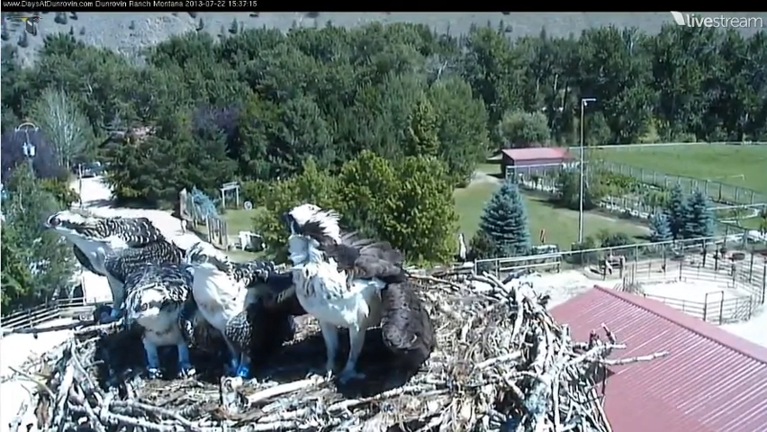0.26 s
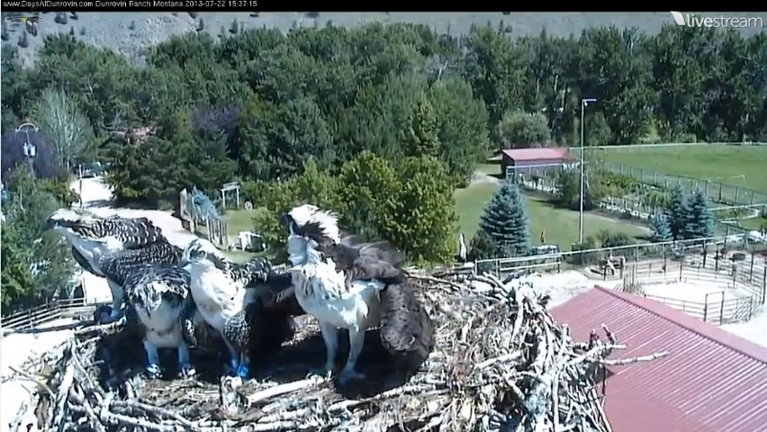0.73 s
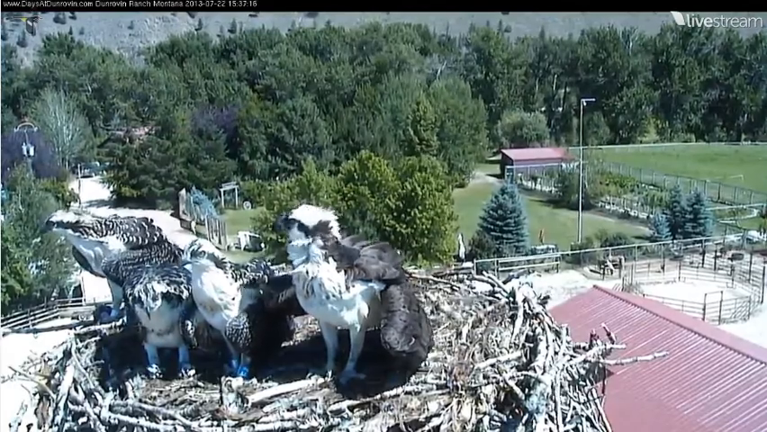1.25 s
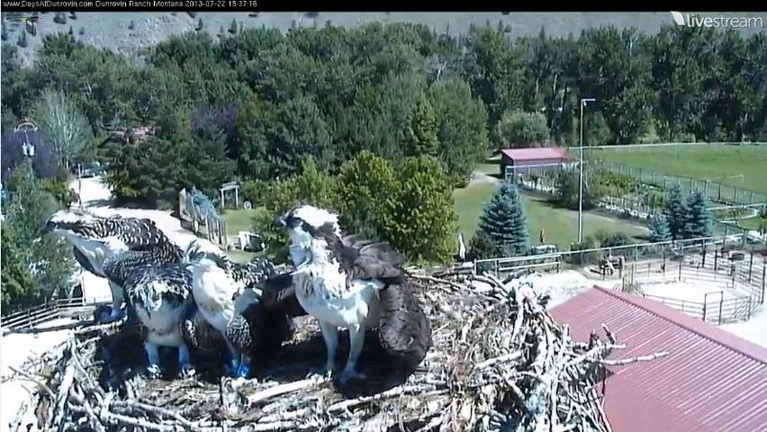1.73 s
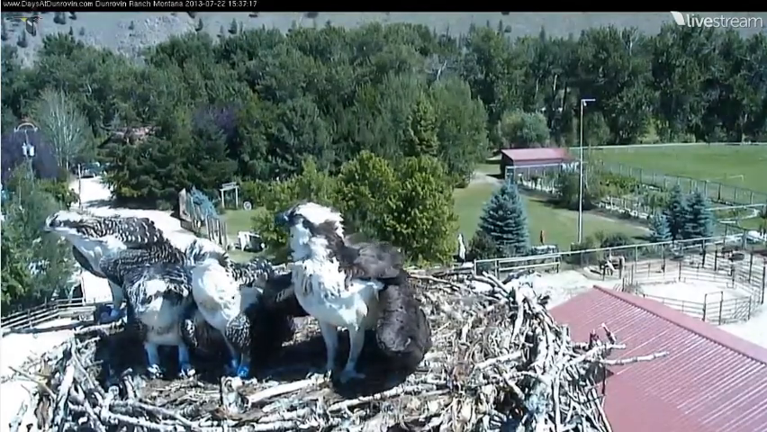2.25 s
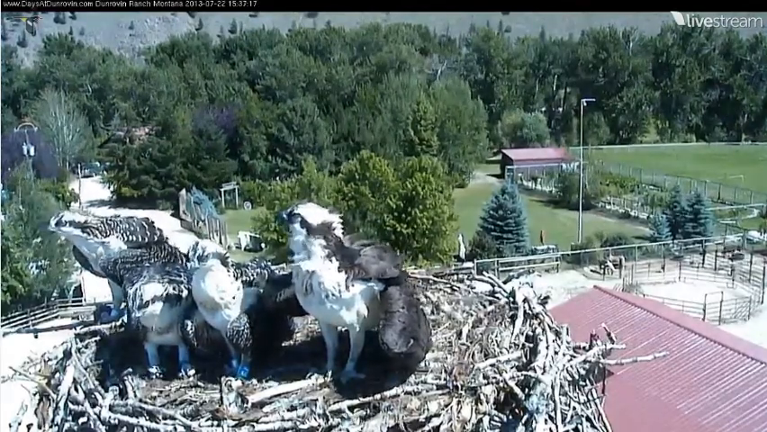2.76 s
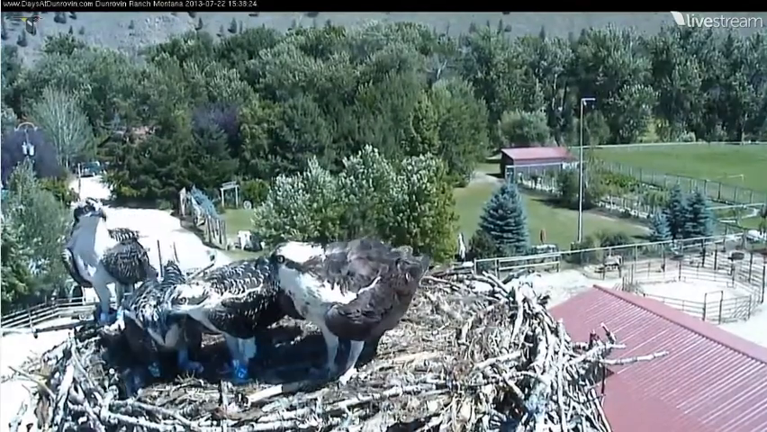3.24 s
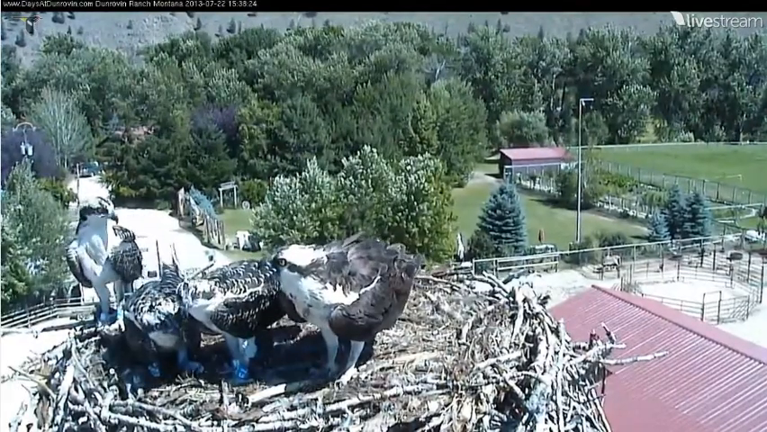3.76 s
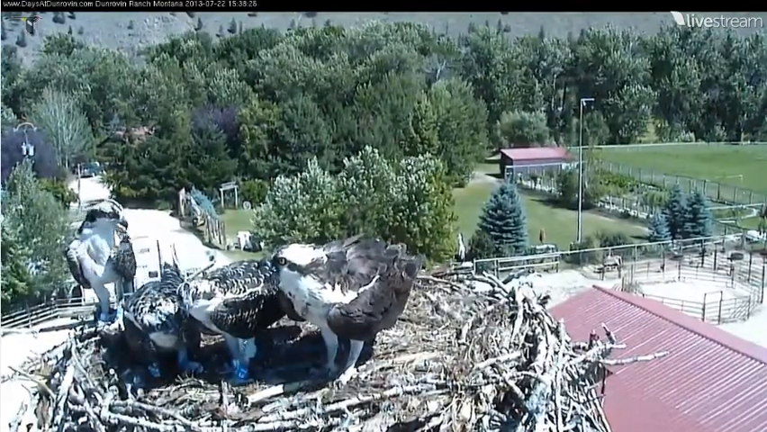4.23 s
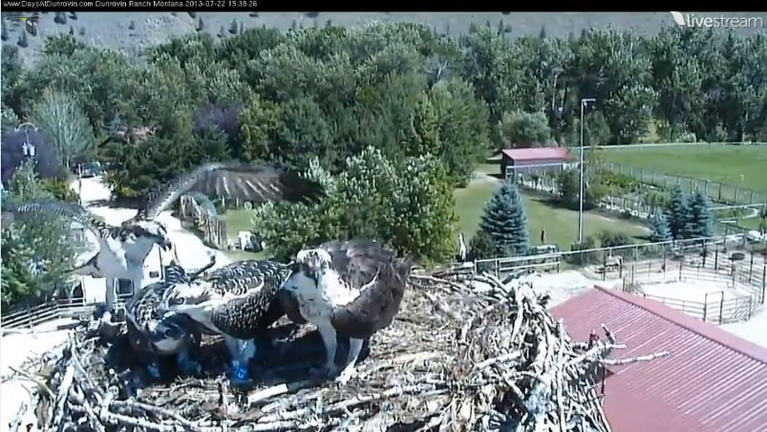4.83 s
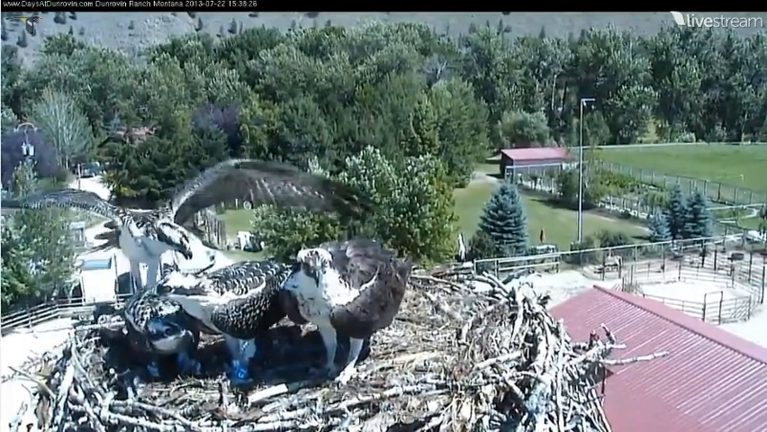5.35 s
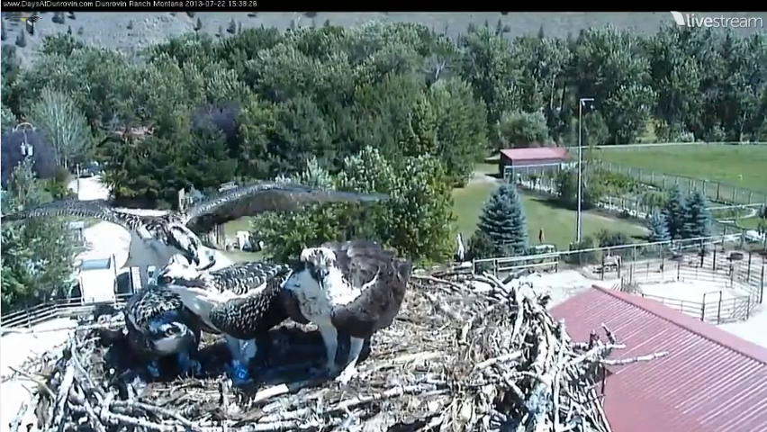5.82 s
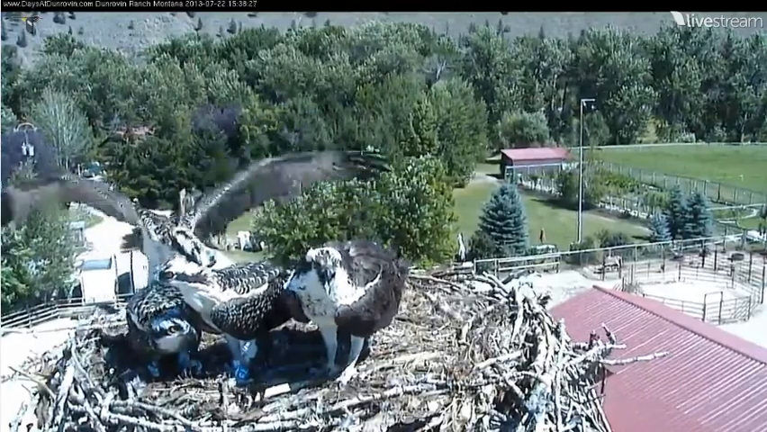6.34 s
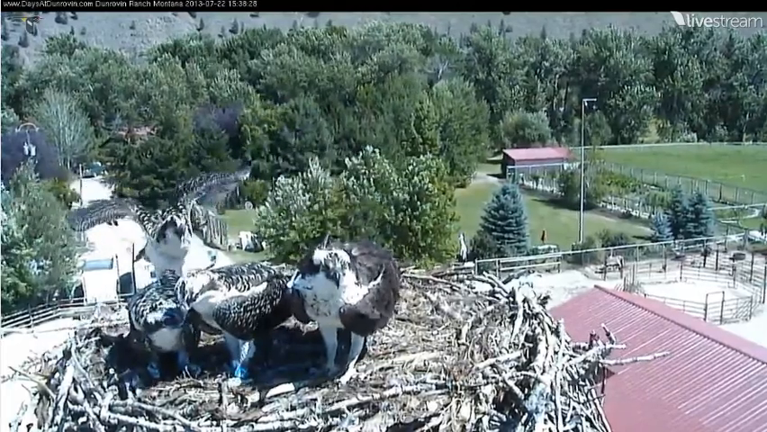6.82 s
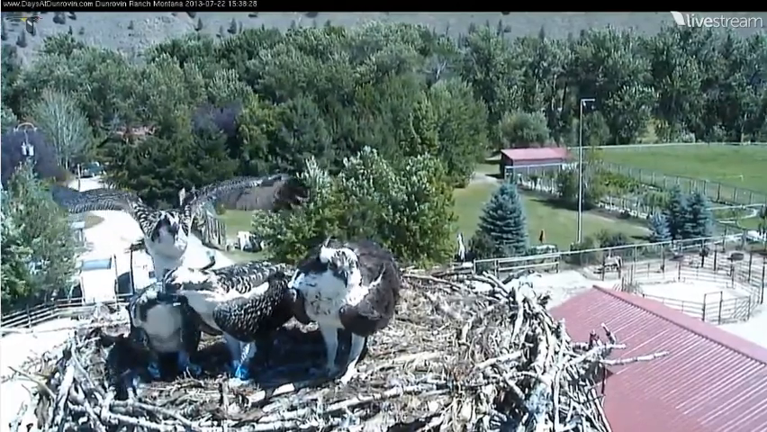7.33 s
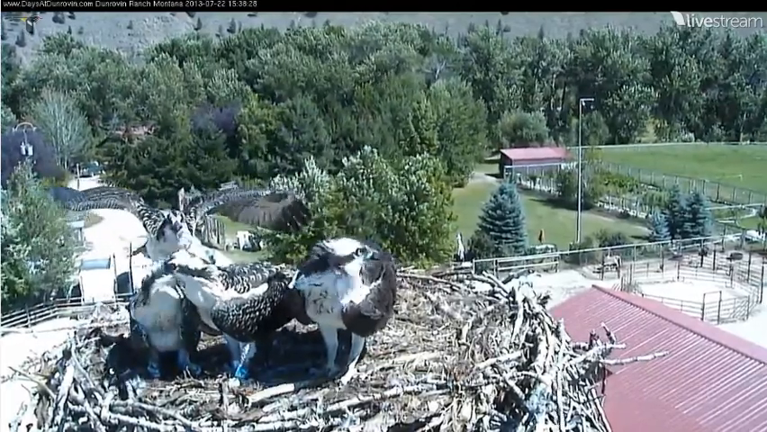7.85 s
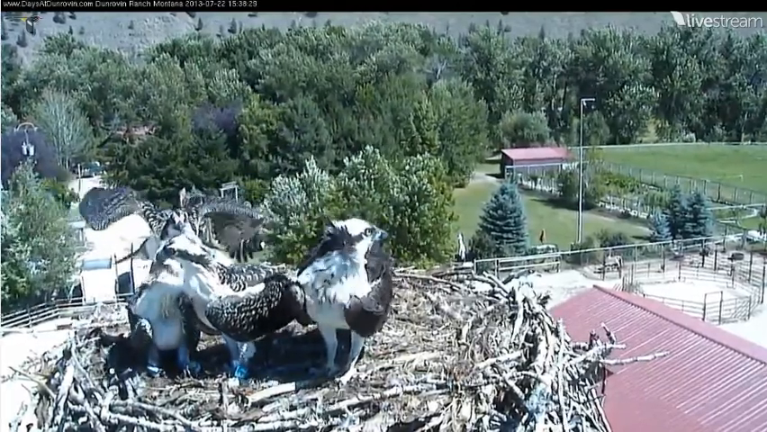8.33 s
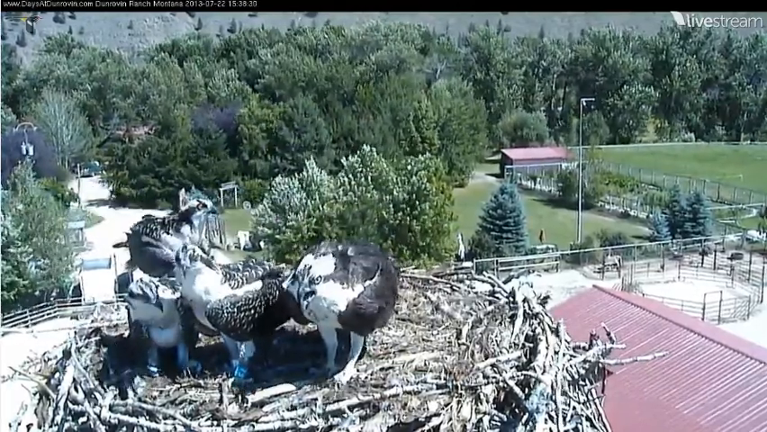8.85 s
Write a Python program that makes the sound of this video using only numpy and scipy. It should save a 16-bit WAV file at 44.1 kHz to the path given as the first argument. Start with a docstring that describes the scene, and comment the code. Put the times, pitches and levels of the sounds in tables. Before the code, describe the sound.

Three warbled songbird chirps over steady hum and hiss, then two ospreys whistle sharp, high, overdriven notes in quickening runs, close on the left.

```python
"""Two ospreys on a nest, close to the left microphone, whistle arched notes: near sines on gliding pitch curves.
A small songbird nearby gives three warbled chirps before them; far songbirds twitter and trill faintly.
Mains hum, broad hiss and light wind lie beneath, as steady sines and shaped noise.
Loud notes overload a slow converter, so their overtones fold back around the whistle,
and then overload the output once more, with grit."""
import sys
import numpy as np
from scipy import signal
from scipy.io import wavfile
from scipy.ndimage import uniform_filter1d

SR = 44100
rng = np.random.default_rng(int(sys.argv[2]) if len(sys.argv) > 2 else 0)


def generate_wav(signal):
    """Clip the signal to [-1, 1] and save it as 16-bit WAV at the path in sys.argv[1]."""
    frames = np.transpose(np.atleast_2d(signal))
    scaled = np.clip(frames, -1, 1) * 32767
    pcm = np.round(scaled).astype(np.int16)
    wavfile.write(sys.argv[1], SR, pcm)


def linear_from_db(decibels):
    """Turn decibels (scalar or array-like) into linear amplitude factors; 0 gives 1."""
    return 10 ** (np.asarray(decibels, float) / 20)


N = 400428

# hoarse notes of the first osprey: start_s, length_s, top_pitch_hz, effort_db (relative)
FIRST_OSPREY = [(3.571, 0.053, 2565, -9), (3.73, 0.068, 2864, -2), (3.89, 0.068, 2936, -1.5),
                (4.051, 0.067, 2924, -3), (4.223, 0.064, 3000, -3), (4.38, 0.065, 3083, -3.5),
                (4.551, 0.068, 3094, -2), (4.715, 0.059, 3204, -5.5), (4.888, 0.05, 3190, -11.5),
                (5.055, 0.063, 3140, -12.5), (5.225, 0.064, 3150, -12.5), (5.406, 0.076, 3100, -10.5),
                (5.596, .058, 2995, -8), (5.765, 0.062, 3064, -8.5), (5.933, 0.079, 3013, -2.5),
                (6.095, 0.084, 3068, -1), (6.266, 0.082, 3252, -2), (6.437, 0.081, 3240, -1.5),
                (6.611, 0.087, 3236, -1), (6.795, 0.085, 2987, -2.5)]
# clear notes of the second osprey: start_s, length_s, top_pitch_hz, final_droop_hz,
# grace_length_s (low grace note before it, 0 for none)
SECOND_OSPREY = [(3.174, 0.084, 2668, 300, 0), (4.676, 0.082, 2597, 362, 0), (4.838, .075, 2825, 494, 0.02),
                 (4.998, 0.072, 2882, 542, .023), (5.159, 0.069, 2832, 305, 0.018),
                 (5.331, 0.078, 2792, 184, 0.033), (5.511, 0.075, 2798, 308, .025),
                 (5.727, 0.073, 2708, 292, 0.023), (7.101, 0.08, 2616, 416, 0),
                 (7.258, 0.077, 2820, 479, 0.019), (7.415, 0.077, 2880, 474, 0.018),
                 (7.578, 0.073, 2825, 288, 0.021), (7.744, 0.077, 2885, 319, 0.022),
                 (7.912, .081, 2905, 348, .017), (8.083, 0.078, 2935, 333, .023),
                 (8.256, .076, 2946, 371, 0.02), (8.426, 0.081, 2947, 315, 0.015),
                 (8.603, 0.081, 3027, 300, .018), (8.781, .078, 3060, 314, 0.025),
                 (8.957, 0.082, 3040, 257, 0.026)]
# brief flips of an osprey into a higher register: start_s, length_s, pitch_hz, level_db (relative)
REGISTER_FLIPS = [(4.866, 0.031, 3567, -2.5), (5.027, 0.017, 3710, -6.5), (6.3, 0.019, 3790, -4.5),
                  (6.476, 0.012, 3817, -5.5), (6.657, 0.0078, 3654, -4), (7.446, 0.017, 3540, -6.5)]
# turning points of each near songbird chirp, one list per chirp: time_s, pitch_hz, level_db (relative)
SONGBIRD_CHIRPS = [
    [(.635, 3360, -24), (.662, 3750, -13.5), (.676, 5340, -13), (.701, 5390, -20), (.711, 4100, -3.5),
     (.721, 3206, -16), (.736, 3700, -9), (.748, 3190, -8), (.76, 3550, -1), (.785, 4360, -4),
     (.803, 3300, -6.5), (.85, 3240, -29)],
    [(1.712, 3340, -6), (1.724, 4650, -11), (1.736, 4600, -5), (1.75, 3180, 5.5), (1.758, 4250, -0.5),
     (1.766, 3115, 0), (1.787, 3800, 7.5), (1.808, 2730, 2.5), (1.822, 3040, -0.5), (1.84, 2680, -5),
     (1.88, 2730, -32)],
    [(2.605, 3545, -10), (2.619, 3810, -8.5), (2.628, 5005, -14), (2.656, 5360, -17), (2.667, 3900, -3.5),
     (2.677, 3060, -11), (2.687, 3820, -2), (2.7, 3050, -34), (2.707, 3250, 0.5), (2.737, 4220, -6.5),
     (2.752, 3650, -1.5), (2.77, 2930, -20)],
]
# thin far trills: start_s, length_s, starting_pitch_hz, level_db (relative)
FAR_TRILLS = [(0.324, 0.24, 7950, -46), (2.31, 0.26, 7900, -48.5)]
# mains lines: pitch_hz, level_db (rms)
MAINS_LINES = [(120.1, -33.5), (240.1, -37.5), (360.1, -44.5), (516, -49), (1092, -43.5)]
# spectrum of the broad hiss: frequency_hz, density_db (relative, per Hz)
HISS_SPECTRUM = [(25, -34), (60, -17), (130, -7.5), (300, -12), (600, -13.5), (1500, -10), (2650, -7),
                 (3800, -17), (5300, -31.5)]
# likeness of the hiss in the two microphones: frequency_hz, correlation (0 to 1)
HISS_LIKENESS = [(60, 0.15), (150, 0.4), (600, 1), (1400, 0.95), (3000, 0.48), (5000, 0.29)]
# balance of the hiss: frequency_hz, left_over_right_db
HISS_BALANCE = [(60, 5.5), (250, 0.5), (1300, -0.5), (2400, 3), (3400, 13), (4400, 5.5)]
# swell of the treble of the hiss: time_s, level_db (relative)
HISS_TREBLE = [(0, 0.5), (1.5, 2), (3, 2), (3.3, -1.5), (5, -7), (7, -3), (9.1, -9.5)]
# strength of the wind: time_s, level_db (relative)
WIND_LEVEL = [(0, -51), (3.06, -52), (3.49, -39), (4.75, -38.5), (5.36, -33.5), (5.87, -49.5), (6.9, -43.5),
              (7.1, -37.5), (7.66, -36), (8.42, -53), (9.0, -40.5)]
# spectrum of the electronic hiss: frequency_hz, density_db (relative, per Hz)
ELECTRONIC_SPECTRUM = [(3180, -33.5), (5400, 4.5), (6360, 2.5), (7610, -8.5), (8370, -10.5), (11600, -10.5),
                       (14000, -19)]
# echoes from roofs: delay_s, level_db (relative)
ROOF_ECHOES = [(.07, -36), (.103, -34), (.112, -34), (.124, -33)]
# spectrum of the grit on overloaded notes: frequency_hz, density_db (relative, per Hz)
GRIT_SPECTRUM = [(300, 10.5), (1200, -0.5), (2500, 16), (4500, -17), (6500, -14.5), (8300, -1),
                 (12200, -25), (13900, -3), (15500, -66)]
# the nearest of the far songbirds: start_s, level_db (relative)
FAR_SONGBIRDS = [(.92, -17.5), (2.82, -21), (3.68, -19.5), (4.3, -21), (4.79, -17), (5.24, -19), (5.6, -16),
                 (5.72, -30), (6.07, -30), (6.83, -18.5), (7.25, -20.5), (8.54, -19), (8.7, -17),
                 (8.86, -21)]


def evened(x):
    """Scale to an rms of 1 over all channels."""
    return x / np.sqrt(np.mean(x ** 2) + 1e-20)


def read(points, hz):
    """Read a curve of (frequency, value) points along log frequency."""
    f, value = np.transpose(points)
    return np.interp(np.log(hz + 1), np.log(f + 1), value)


def add(mix, start_s, sound):
    """Lay a sound into the mix at its start time, cut at the end of the mix."""
    part = mix[round(start_s * SR):][:len(sound)]
    part += sound[:len(part)]


def wobble(count, seconds):
    """Smoothed random drift of rms 1; a longer smoothing time drifts more slowly."""
    drift = uniform_filter1d(rng.standard_normal(count), max(round(seconds * SR), 1))
    return evened(uniform_filter1d(drift, 40))


def hum():
    """Steady mains lines, each a sine with a slight drift of level, the same in both microphones."""
    t = np.arange(N) / SR
    mix = np.zeros(N)
    for hz, db in MAINS_LINES:
        level = linear_from_db(db + 0.28 * wobble(N, 0.22)) * np.sqrt(2)  # a sine's peak over its rms
        mix += level * np.sin(2 * np.pi * (hz * t + rng.random()))
    return mix


def noise(spectrum, db, likeness, balance, swell=((0, 0), (1, 0)), patchy_db=2.0):
    """Random short-time spectra with drifting treble patches, partly shared by the microphones."""
    frames, hz = N // 256 + 5, np.fft.rfftfreq(1024, 1 / SR)
    a, b, c, d, patches = rng.standard_normal((frames, 513, 5)).T
    patches = evened(uniform_filter1d(uniform_filter1d(patches, 10, 0), 8, 1))
    same = np.clip(read(likeness, hz), -1, 1)[:, None]
    left = a + 1j * b
    right = same * left + np.sqrt(1 - same ** 2) * (c + 1j * d)
    treble = np.clip((hz - 2000) / 1500, 0, 1)[:, None]  # swell and patches fade in from 2 to 3.5 kHz
    swell_db = np.interp(np.arange(frames) * 256 / SR, *np.transpose(swell)) + patchy_db * patches
    lean_db = read(balance, hz)[:, None] / 2
    shape_db = read(spectrum, hz)[:, None] + np.array([lean_db, -lean_db]) + treble * swell_db
    spectra = np.array([left, right]) * linear_from_db(shape_db)
    return linear_from_db(db) * evened(signal.istft(spectra, nperseg=1024, noverlap=768)[1][:, :N])


def hiss():
    """Broad background hiss, shaped noise whose treble swells and is patchy."""
    return noise(HISS_SPECTRUM, -24, HISS_LIKENESS, HISS_BALANCE, HISS_TREBLE, patchy_db=4.0)


def electronic_hiss():
    """Faint electronic hiss, noise with a strong shared part in the two channels."""
    likeness, balance = [(0, .6), (1, 0.91)], [(0, 0.0068), (1, 0.0014)]
    return noise(ELECTRONIC_SPECTRUM, -53.5, likeness, balance)


def wind():
    """Lumpy low rumble: band-passed noise, partly shared by the two microphone ports."""
    band = signal.butter(2, [22, 170], "band", fs=SR, output="sos")
    gusts = signal.sosfilt(band, rng.standard_normal((3, N)))
    lumps_db = 2.5 * wobble(N, .04)
    lumps = linear_from_db(np.interp(np.arange(N) / SR, *np.transpose(WIND_LEVEL)) + lumps_db)
    return linear_from_db(5.0) * lumps * evened(gusts[:2] + 1.8 * gusts[2])  # the third is common to both ports


def whistle(hz, db, rise, fall, octave_db, breath_db=-40):
    """A near sine with its octave, hoarse breath, a slight tremble and soft ends (rise and fall in s)."""
    band = signal.butter(2, [2600, 4700], "band", fs=SR, output="sos")
    breath = linear_from_db(breath_db) * evened(signal.sosfilt(band, rng.standard_normal(len(hz))))
    t = np.arange(len(hz)) / SR
    trembling_hz = hz * (1 + 0.0031 * wobble(len(hz), 0.00056))
    phase = 2 * np.pi * np.cumsum(trembling_hz) / SR
    ends = np.clip(np.minimum(t / rise, t[::-1] / fall), 0, 1) ** 1.16
    voice = np.sin(phase) + linear_from_db(octave_db) * np.sin(2 * phase) + breath
    return linear_from_db(db + 0.42 * wobble(len(hz), 0.02)) * ends * voice


def trills():
    """Faint buzzy ticks in high-low pairs, sinking in pitch."""
    mix = np.zeros(N)
    for start_s, length_s, hz, db in FAR_TRILLS:
        t = np.arange(round(length_s * SR)) / SR
        swing = np.sin(2 * np.pi * 26.5 * t)  # one tick at each extreme of the pitch swing
        ticks = (0.089 + swing ** 2) * (1 + 0.57 * wobble(len(t), 0.0014))
        tone = whistle(hz + 200 * swing - 900 * t, db, rise=0.027, fall=.04, octave_db=-74)
        add(mix, start_s, ticks * tone)
    return mix


def chirp(rows):
    """A fast warble; two sides of the voice box beat against each other, more so where it rasps."""
    time_s, *columns = np.transpose(rows)
    t = np.arange(time_s[0], time_s[-1], 1 / SR)
    hz, db = (np.interp(t, time_s, column) for column in columns)
    rasp = np.where(np.linspace(0, 1, len(t)) < 0.56, 0.16, 0.59)  # raspier past 56 % of its length
    beat_hz = 150 + 60 * wobble(len(t), 0.01106)
    beat = 1 - rasp + rasp * 1.1 * np.cos(2 * np.pi * np.cumsum(beat_hz) / SR)
    return time_s[0], beat * whistle(uniform_filter1d(hz, 130), db, rise=0.0012, fall=.003, octave_db=-28)


def songbird():
    """The near songbird's three chirps."""
    mix = np.zeros(N)
    for rows in SONGBIRD_CHIRPS:
        add(mix, *chirp(rows))
    return mix


def yard(x, tail_db, t60):
    """A few distinct echoes and a short scattered tail, other in each microphone (t60 in s)."""
    t = np.arange(round(.4 * SR)) / SR
    scattered = rng.random((2, len(t))) < .05
    tail = rng.standard_normal((2, len(t))) * scattered * linear_from_db(-60 * t / t60) * (t > .004)
    tail *= linear_from_db(tail_db) / np.linalg.norm(tail[0])
    for delay_s, db in ROOF_ECHOES:
        tail[:, round(delay_s * SR)] += linear_from_db(db)
    return signal.oaconvolve(x[None], tail, axes=1)[:, :N]


def twitter():
    """Far songbirds repeat the second chirp, each a little higher or lower, smeared by distance."""
    mix = np.zeros(N)
    faint_count, faint_db = 6, -32.5  # fainter calls, scattered by chance
    slots = (np.arange(faint_count) + rng.random(faint_count)) / faint_count
    calls = FAR_SONGBIRDS + [(slot, faint_db) for slot in slots * N / SR]
    variations = rng.uniform(.93, 1.07, (len(calls), 2))
    for (start_s, db), (pitch, pace) in zip(calls, variations):
        rows = np.array(SONGBIRD_CHIRPS[1]) * [pace, pitch, .5]  # level contour halved in dB
        add(mix, start_s, linear_from_db(db) * chirp(rows)[1])
    return mix * linear_from_db(np.array([[-5], [-6.5]])) + yard(mix, tail_db=-5, t60=0.29)


def glide(length_s, *hz, late=1):
    """A smooth pitch curve through evenly spaced values; late above 1 pushes the top toward the end."""
    u = np.linspace(0, 1, round(length_s * SR)) ** late
    return np.polyval(np.polyfit(np.linspace(0, 1, len(hz)), hz, len(hz) - 1), u)


def second_osprey(mix):
    """Clear arched notes; a low grace note may rise first, before the voice breaks upward."""
    for start_s, length_s, hz, droop_hz, grace_s in SECOND_OSPREY:
        start_hz = hz * (.972 if grace_s > 0 else .91)  # starts nearer the top after a grace note
        arch = glide(length_s, start_hz, hz, hz - droop_hz, late=1.3)
        add(mix, start_s, whistle(arch, 3, rise=0.0048, fall=0.021, octave_db=-20, breath_db=-20))
        if grace_s > 0:
            low = glide(grace_s, .675 * hz, .78 * hz, late=0.831)
            grace_db = 15.5 - 750 * grace_s  # longer grace notes are softer
            grace = whistle(low, grace_db, rise=0.011, fall=0.0015, octave_db=-5.5, breath_db=-17.0)
            add(mix, start_s - grace_s + .001, grace)


def first_osprey(mix):
    """Hoarse arched notes with low-register cracks at both ends; loud notes arch and crack more."""
    soft_db, full_db = -7.5, -3.5  # effort at which the arch is flattest and fullest
    soft_ends, full_ends = np.array((0.96, .9)), np.array((.9, .85))  # start and end as shares of the top
    for start_s, length_s, hz, db in FIRST_OSPREY:
        effort = np.clip((db - soft_db) / (full_db - soft_db), 0, 1)
        start_hz, end_hz = hz * ((1 - effort) * soft_ends + effort * full_ends)
        arch = glide(length_s, start_hz, hz, end_hz, late=1.3)
        rise_s = .0071 * linear_from_db(-1.3 * db)  # soft notes swell slowly
        add(mix, start_s, whistle(arch, db, rise=rise_s, fall=0.0083, octave_db=-52, breath_db=-12))
        # the octave equals the low tone in the opening crack and outweighs it in the closing one
        crack_in = glide(0.0155, .6 * hz, .72 * hz)
        add(mix, start_s - .013, whistle(crack_in, 2 * db - 13.5, rise=0.0035, fall=0.0032,
                                         octave_db=0.0, breath_db=-1.0))
        crack_out = glide(0.0123, .69 * hz, .56 * hz)
        add(mix, start_s + length_s - .005, whistle(crack_out, 2 * db - 20.5, rise=0.0085, fall=0.0057,
                                                    octave_db=11.5, breath_db=-17.0))


def ospreys():
    """Both ospreys; as a voice flips into its higher register the notes beneath thin."""
    mix = np.zeros(N)
    second_osprey(mix)
    first_osprey(mix)
    for start_s, length_s, hz, db in REGISTER_FLIPS:
        u = np.clip((np.arange(N) / SR - start_s) / length_s, 0, 1)
        mix = mix * (1 - 0.74 * np.sin(np.pi * u))
        add(mix, start_s, whistle(glide(length_s, hz, hz), db, rise=0.0018, fall=0.00049, octave_db=-17))
    return mix


def scene():
    """Birds close on the left, over the background shared by both microphones."""
    big, small = linear_from_db(5) * ospreys(), songbird()
    # the right microphone is in the camera's shadow: the ospreys reach it late and dull
    shaded = np.roll(signal.lfilter(*signal.butter(2, 2200, fs=SR), big), 6)
    right = linear_from_db(-27) * shaded + linear_from_db(-26) * small
    wet = yard(big, tail_db=-27, t60=.08) + yard(small, tail_db=-7, t60=.14)
    birds = np.array([big + small, right]) + wet * linear_from_db(np.array([[0], [-19]]))
    return birds + twitter() + hiss() + hum() + wind()


def slow_converter(dry, knee):
    """Clip lopsidedly and keep every fourth sample unfiltered, so odd and even overtones fold back."""
    top = knee * linear_from_db(2.0)
    slow = np.zeros_like(dry)
    slow[:, ::4] = 4 * np.clip(dry, -.85 * top, top)[:, ::4]
    smoothing = signal.firwin(301, 5150, window=("kaiser", 9), fs=SR)
    return signal.oaconvolve(slow, smoothing[None], "same")


def overload_grit(excess):
    """Patchy noise that follows how much the left overload cuts off, and dies a little after the note."""
    shaved = np.sqrt(abs(uniform_filter1d(excess[0] ** 2, 200)))
    linger = np.exp(-1 / (0.011 * SR))  # 11 ms
    shaved = np.maximum(shaved, signal.lfilter([1 - linger], [1, -linger], shaved))
    likeness, balance = [(0, .3), (1, 0.94)], [(2000, 2.0), (4000, 15.3), (6000, 7.2)]
    return np.tanh(shaved / 0.2) * noise(GRIT_SPECTRUM, -20.5, likeness, balance, patchy_db=10.0)


def top_cut(x):
    """Nothing passes above the cut-off."""
    return signal.sosfilt(signal.butter(12, 15520, fs=SR, output="sos"), x)


def record(dry):
    """Overload at a quarter-rate converter, add hiss and trills, then overload again with grit."""
    since = np.arange(N) / SR - 3.05  # the overload level drops at 3.05 s, then sinks 0.33 dB per s
    knee = linear_from_db(np.where(since < 0, 7, -2 - 0.33 * since))
    folded = slow_converter(dry, knee) + electronic_hiss() + trills()
    loud = np.clip(folded, -knee, knee)
    loud += overload_grit(folded - loud)
    high_pass = signal.firwin(101, 5800, pass_zero=False, fs=SR)
    treble = signal.oaconvolve(loud[0], high_pass, "same")
    loud[1] -= linear_from_db(-14) * treble  # the left treble leaks reversed into the right
    return top_cut(np.clip(loud, -1, 1))


dry = scene()
out = record(dry)
generate_wav(out)
```